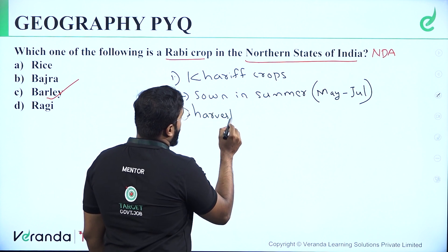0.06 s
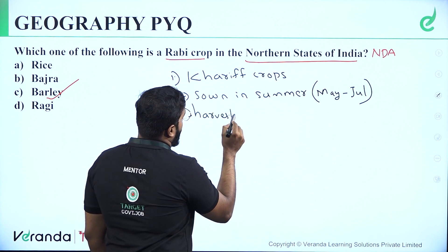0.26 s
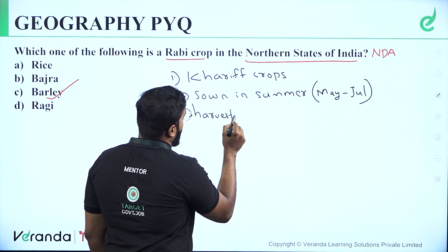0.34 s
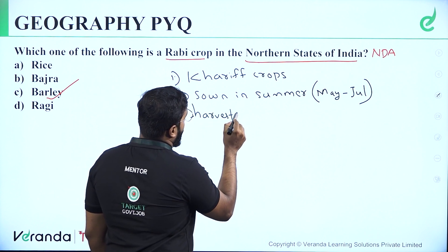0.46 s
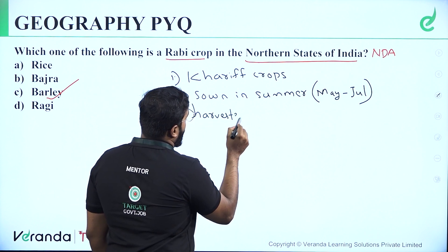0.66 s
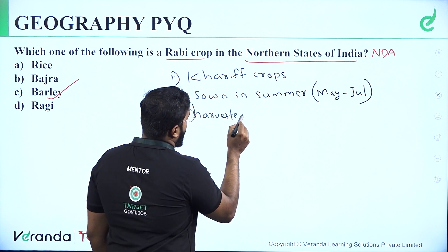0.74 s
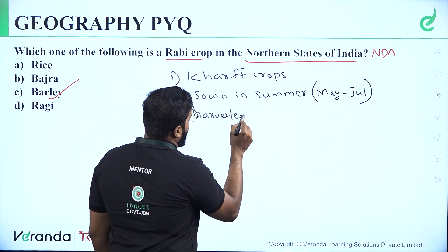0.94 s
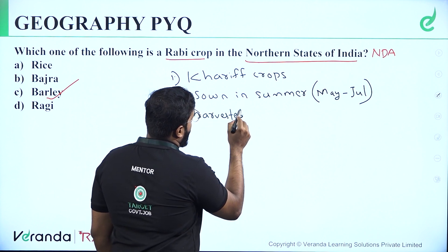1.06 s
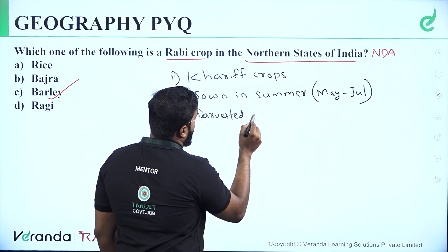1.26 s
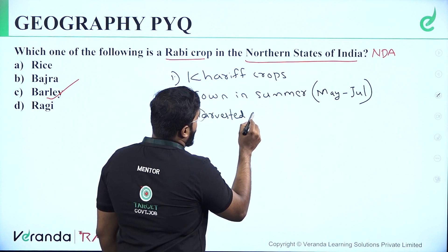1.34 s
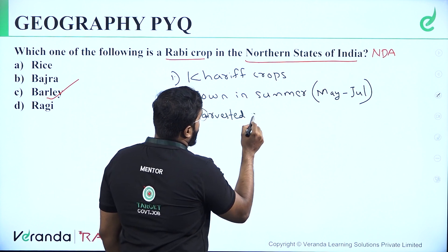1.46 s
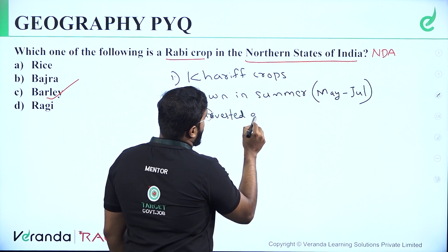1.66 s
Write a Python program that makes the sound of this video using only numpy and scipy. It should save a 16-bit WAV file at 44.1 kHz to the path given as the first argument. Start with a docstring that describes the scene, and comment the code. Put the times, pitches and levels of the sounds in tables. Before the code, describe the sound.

A marker tip knocks on a whiteboard at about 0.23, 0.43, 0.79 and 1.38 seconds, the third slightly softer, the last with more plastic rattle. Each is a bright click over a hollow, woody panel thump, ringing briefly into the room's echo. Faint hissing strokes run between, notably 0.53-0.69, 0.84-1.24 and from 1.4 on. Quiet air, low hum and a barely perceptible high whine lie behind; close microphone, nearly centred.

```python
"""A hard pen tip taps and writes on a whiteboard panel in a quiet classroom, heard by one close microphone.
Each tap is a knock with two returns from the panel's edges, plus fading tones and noise for the
ringing panel and the rattling plastic pen; a wall echo and fading noise give the room's answer.
Between taps the gliding tip makes a faint hiss of uneven noise.
Behind it lie steady noise for the air, a wavering low hum and a thin electronic whine."""
import sys
import numpy as np
from scipy import signal
from scipy.fft import rfft, irfft, next_fast_len
from scipy.io import wavfile
from scipy.ndimage import map_coordinates

SR = 44100
rng = np.random.default_rng(int(sys.argv[2]) if len(sys.argv) > 2 else 0)


def transcribe(u):
    """Save the signal u as a 16-bit wav file named by the first command-line argument.

    u: samples, shape (n,) or (channels, n), limited to [-1, 1]; the rate is SR.
    q: integer samples, one column per channel.
    """
    v = np.clip(np.atleast_2d(u).T, -1, 1)
    q = np.round(v * 32767).astype(np.int16)
    wavfile.write(sys.argv[1], SR, q)


N = 74970  # length in samples

# Steady air of the room: f/Hz, relative level/dB (noise shapes like this one are scaled to rms 1)
AIR_SHAPE = [(25, -23), (60, -11.5), (95, -3.5), (130, 1), (180, 2.5), (300, -3), (600, -4.5), (1000, -9.5),
             (2000, -22.5), (4000, -28.5), (10000, -32.5), (16000, -32)]
AIR_DB = -54.5
HUM_HZ, HUM_DB = 90.8, -71
WHINE_HZ, WHINE_DB = 13744, -75

# Strokes of the gliding tip: start/s, end/s, level/dB
STROKES = [(-.02, 0.067, -64.5), (.25, 0.382, -78), (0.533, .69, -64.5), (0.837, 1.108, -64),
           (1.125, 1.238, -62.5), (1.405, 1.641, -64), (1.657, 1.72, -64)]
# Hiss of the gliding tip: f/Hz, relative level/dB
GLIDE_SHAPE = [(1000, 6.5), (3000, -7), (4700, -0.5), (6000, -2.5), (7300, -3), (8600, -4.5), (9400, 6.5),
               (10200, -1), (11600, 1.5), (13000, -5), (16000, -15)]
GLIDE_FADE_S, GLIDE_ROUGH_DB = 0.034, 1.5  # fade at each stroke end, unevenness of the grip

# The room's answer to a tap: f/Hz, relative level/dB
ROOM_SHAPE = [(40, -14), (130, -9), (260, -0.5), (550, -3.5), (740, -1), (1100, -3.5), (2000, -12),
              (3200, -20), (4700, -17), (6200, -27.5), (10000, -27.5), (16000, -31)]
# How long the room's answer takes to fall by 60 dB: f/Hz, t60/s
ROOM_T60 = [(150, 0.75), (700, 0.84), (2000, 0.76), (5000, 0.6), (12000, 0.24)]
ROOM_DB, ROOM_RISE_S = -38, 0.0027
EARLIER_TAP_S = -0.11  # a tap whose echo is still dying away at the start
WALL_S, WALL_DB = 0.015, -15  # the first echo, off a near wall

# Tones of the pen's barrel: f/Hz, level/dB (before the scatter), t60/s
PEN_MODES = [(3866, -34, .03), (4210, -29, 0.022), (4520, -24, 0.021), (4826, -23.5, 0.025),
             (4720, -43, 0.046)]
PEN_DELAY_S, PEN_RISE_S = 0.001424, 0.00086
# Crack of plastic on the surface: f/Hz, relative level/dB
CRACK_SHAPE = [(1000, -22), (2500, 3), (3500, -5.5), (4000, 3.5), (5100, 2.5), (5700, -4), (7600, -7),
               (8400, -17.5), (9500, -6), (10200, -11), (11700, -6.5), (13000, -17), (16000, -23)]
# How long the crack takes to fall by 60 dB: f/Hz, t60/s
CRACK_T60 = [(2000, 0.038), (5000, 0.045), (9000, 0.05), (13000, 0.025), (16000, .018)]
CRACK_DB, CRACK_RISE_S = -28, 0.00075
SNAP_DB, SNAP_T60_S, SNAP_LOW_HZ = -22.5, 0.0051, 6100  # the bright first instant of contact

# Tones of the panel: f/Hz, level/dB (before the scatter and each tap's ring level), t60/s
PANEL_MODES = [(251.7, -38.5, 0.55), (302.4, -48.5, 0.4), (367, -46, 0.71), (463.7, -37, 0.26),
               (697, -39, 0.57), (755, -41.5, 0.59), (1015, -41, 0.22), (1218, -67, 0.31),
               (1354, -39.5, .2), (1630, -41, 0.083), (1900, -75, 0.051), (2146, -34, 0.072)]
# Vibration scattered through the panel: f/Hz, relative level/dB
SCATTER_SHAPE = [(100, -13), (500, -16), (750, 9), (1200, 4), (2200, -3.5), (3200, -11), (8000, -24)]
SCATTER_DB, SCATTER_T60_S, SCATTER_RISE_S = -25.5, 0.064, 0.0029
MODE_SCATTER_DB = 2.5  # how much each tone's level varies from strike to strike
BLUR_HZ, BLUR_RAD = 24.7, 1  # speed and depth of the tones' phase wander

# Knock of the tip on the panel: f/Hz, level/dB (before KNOCK_DB)
KNOCK_SHAPE = [(40, -24), (200, -12.5), (480, -11), (720, 9), (1050, 4), (1500, -1.5), (2200, -7),
               (3100, -18.5), (5000, -48.5), (15000, -77)]
KNOCK_DB = 9.5
# Strength of the two returns from the panel's edges: gain/1, one per return
RETURN_GAINS = (0.82, 0.41)
# Taps: t/s, level/dB, rattle/dB, panel ring/dB, first edge return/ms, second edge return/ms
TAPS = [(0.2273, 0, 0, -1, 2.87, 4.44), (0.4254, 0.17, 0, 1.5, 2.687, 4.12),
        (0.792, -2, -0.5, 0, 2.8, 5.76), (1.3795, 0, 2.5, -2, 3.33, 4.04)]

BALANCE_DB = -1.29  # left over right
TOP_HZ = 15750  # middle of the recorder's upper cut


def amp(db):
    """Turn decibels into a plain multiplier."""
    return 10 ** (np.asarray(db) / 20)


def unit(x):
    """Scale a sound to rms 1."""
    return x / np.sqrt(np.mean(x ** 2) + 1e-20)


def along(points, hz):
    """Read between (frequency, value) points on a log frequency axis."""
    f, value = np.transpose(points)
    return np.interp(np.log(hz + 1), np.log(f + 1), value)  # + 1 avoids log(0)


def filtered(x, response):
    """Multiply the spectrum of x by a response that depends on frequency."""
    size = next_fast_len(N + SR // 2)  # spare room so that tails do not wrap around
    gains = response(np.fft.rfftfreq(size, 1 / SR))
    return irfft(rfft(x, size) * gains, size)[..., :N]


def noise(spectrum):
    """Random noise coloured by a spectrum, at rms 1."""
    return unit(filtered(rng.standard_normal(N), lambda hz: amp(along(spectrum, hz))))


def pulse(spectrum, size=4096):
    """A minimum-phase pulse: the spectrum's energy comes as early as possible."""
    level = amp(along(spectrum, np.fft.rfftfreq(size, 1 / SR)))
    cepstrum = irfft(np.log(level))
    # fold the backward half onto the forward half, so nothing sounds before the start
    cepstrum[1:size // 2] *= 2
    cepstrum[size // 2 + 1:] = 0
    return irfft(np.exp(rfft(cepstrum)))


def onset(rise):
    """A quick rise towards full level."""
    return 1 - np.exp(-np.arange(N) / SR / rise)


def fade(t60, rise):
    """A quick rise, then an exponential fall of 60 dB every t60 seconds."""
    return np.exp(-np.log(1000) * np.arange(N) / SR / t60) * onset(rise)


def dying(spectrum, t60s):
    """Coloured noise in which each frequency dies at its own speed."""
    hz, t, grid = signal.stft(noise(spectrum), SR, nperseg=128)
    decay = np.exp(-np.log(1000) * t / along(t60s, hz)[:, None])
    return signal.istft(grid * decay, SR)[1][:N]


def wobble(rate_hz):
    """A smooth curve through rate_hz random points per second."""
    return map_coordinates(rng.standard_normal(1000), [np.arange(N) * rate_hz / SR], mode="mirror")


def ring(modes, rise):
    """Fading tones of a struck body, slightly blurred and with new random levels at each strike."""
    t = np.arange(N) / SR
    out = np.zeros(N)
    for hz, db, t60 in modes:
        level = amp(db + MODE_SCATTER_DB * rng.standard_normal())
        wander = BLUR_RAD * wobble(BLUR_HZ) * (1 - np.exp(-t * BLUR_HZ))  # starts from none
        tone = np.sin(2 * np.pi * hz * t + wander)
        out += level * fade(t60, rise) * tone
    return out


def at(s, x):
    """Move x to start at s seconds; a negative start cuts off its beginning."""
    k = round(s * SR)
    return np.pad(x, (max(k, 0), N))[max(-k, 0):][:N]


def room_tone():
    """Steady air noise, a narrow noise band as a wavering hum, and a pure tone as the whine."""
    t = np.arange(N) / SR
    air = noise(AIR_SHAPE)
    hum = unit(filtered(rng.standard_normal(N), lambda hz: np.exp(-((hz - HUM_HZ) / 4) ** 2)))
    whine = np.sqrt(2) * np.sin(2 * np.pi * WHINE_HZ * t)  # sqrt(2) gives rms 1
    return amp(AIR_DB) * air + amp(HUM_DB) * hum + amp(WHINE_DB) * whine


def room():
    """The diffuse echo of one tap, as noise whose highest treble dies first."""
    return amp(ROOM_DB) * dying(ROOM_SHAPE, ROOM_T60) * onset(ROOM_RISE_S)


def glide():
    """Friction of the moving tip: hiss made slightly uneven by slow random changes of grip."""
    t = np.arange(N) / SR
    level = np.zeros(N)
    for start, end, db in STROKES:
        inside = np.minimum(t - start, end - t)  # seconds to the nearer end of the stroke
        level += amp(db) * np.clip(inside / GLIDE_FADE_S + 0.5, 0, 1)
    grip = unit(filtered(rng.standard_normal(N), lambda hz: hz < 120))
    return level * amp(GLIDE_ROUGH_DB * grip) * noise(GLIDE_SHAPE)


def pen():
    """The tip snaps and cracks on the surface and the barrel rings just after."""
    bright = unit(filtered(noise(CRACK_SHAPE), lambda hz: hz > SNAP_LOW_HZ))
    snap = amp(SNAP_DB) * bright * fade(SNAP_T60_S, CRACK_RISE_S)
    crack = amp(CRACK_DB) * dying(CRACK_SHAPE, CRACK_T60) * onset(CRACK_RISE_S)
    barrel = at(PEN_DELAY_S, ring(PEN_MODES, PEN_RISE_S))
    return snap + crack + barrel


def panel(ring_db):
    """The panel rings in its own tones over a brief dense shudder of noise."""
    tones = -amp(ring_db) * ring(PANEL_MODES, rise=0.0017)  # minus: same direction as the knock
    shudder = amp(SCATTER_DB) * noise(SCATTER_SHAPE) * fade(SCATTER_T60_S, SCATTER_RISE_S)
    return tones + shudder


def knock(returns_ms):
    """The tip's push on the panel, followed by weaker delayed copies from the edges."""
    def paths(hz):
        total = 1  # the direct push
        for gain, ms in zip(RETURN_GAINS, returns_ms):
            total = total + gain * np.exp(-2j * np.pi * hz * ms / 1000)  # a delay of ms
        return total
    return -amp(KNOCK_DB) * filtered(pulse(KNOCK_SHAPE), paths)


def taps():
    """Every touch-down sounds panel, pen and room; the knock also comes back off a wall."""
    out = at(EARLIER_TAP_S, room())
    for s, db, rattle_db, ring_db, *returns_ms in TAPS:
        blow = knock(returns_ms)
        direct = blow + panel(ring_db) + amp(rattle_db) * pen()
        wall_echo = amp(WALL_DB) * at(WALL_S, blow)
        out = out + at(s, amp(db) * (direct + wall_echo + room()))
    return out


def scene():
    """One microphone feeds both channels; the balance setting makes the left a little quieter."""
    mono = room_tone() + glide() + taps()
    return mono * amp([[BALANCE_DB / 2], [-BALANCE_DB / 2]])


def record(dry):
    """The recorder keeps nothing above its band limit, reached over a 500 Hz slope."""
    return filtered(dry, lambda hz: np.clip((TOP_HZ - hz) / 500 + 0.5, 0, 1))


dry = scene()
out = record(dry)
transcribe(out)
```